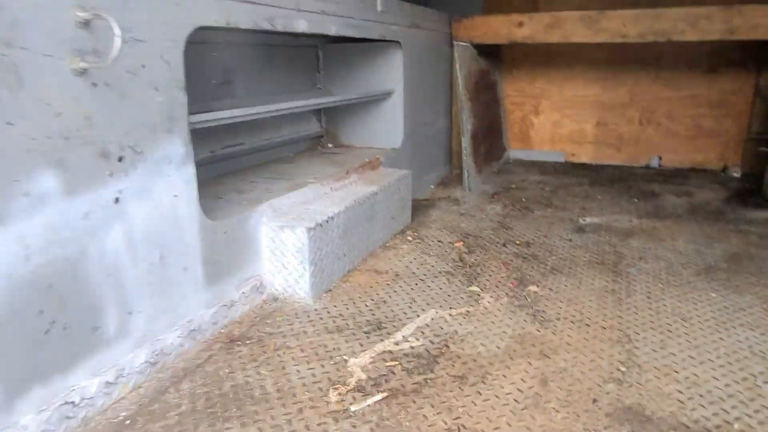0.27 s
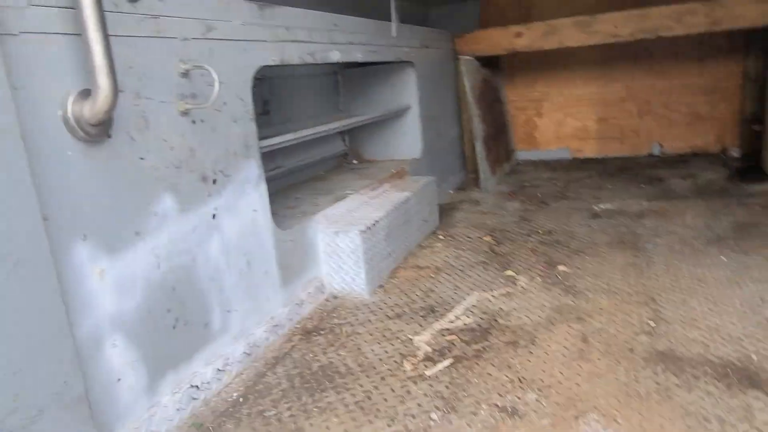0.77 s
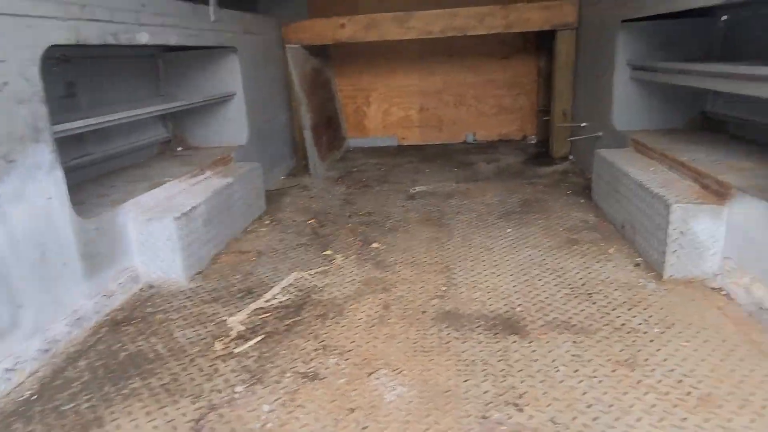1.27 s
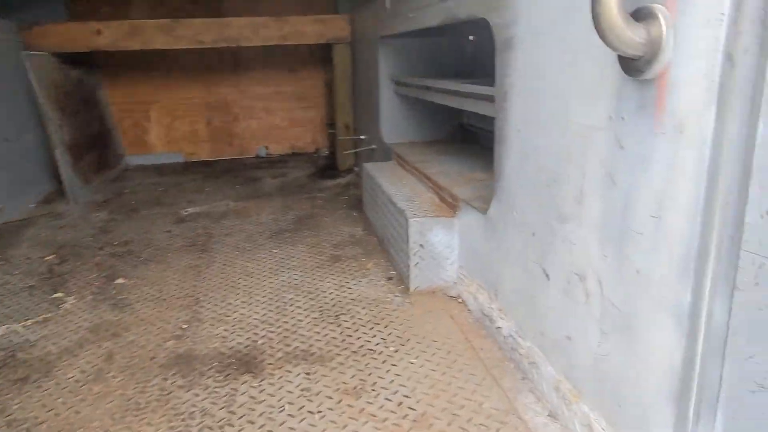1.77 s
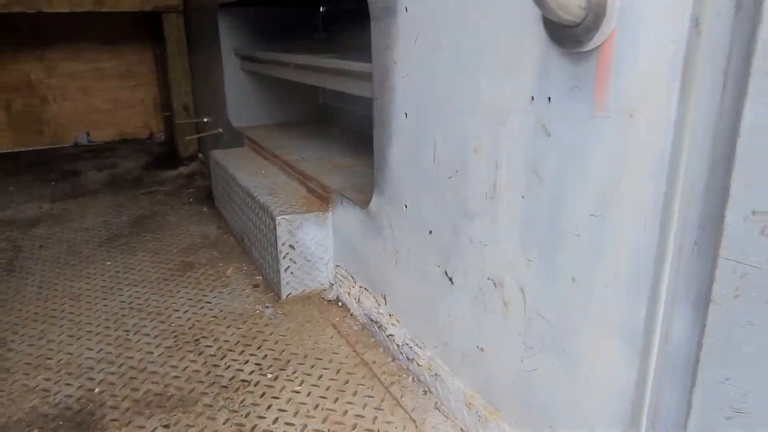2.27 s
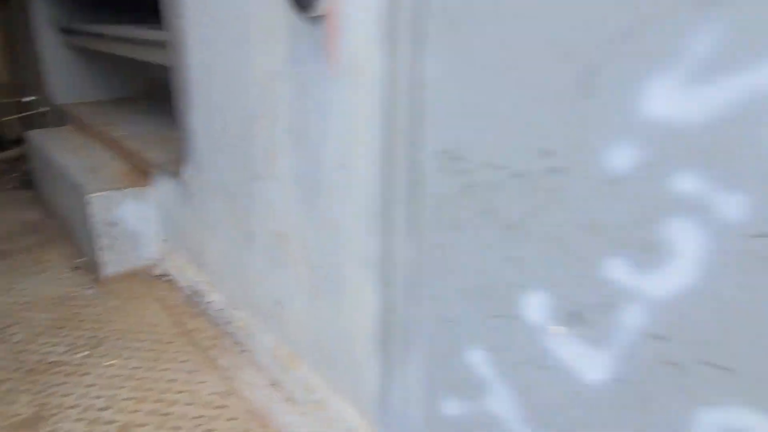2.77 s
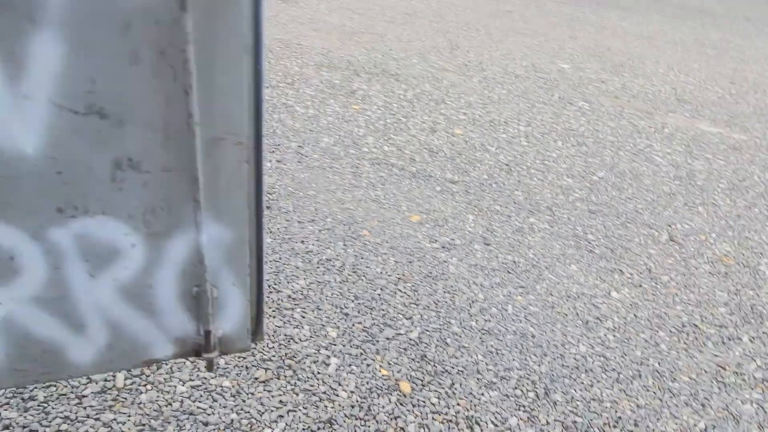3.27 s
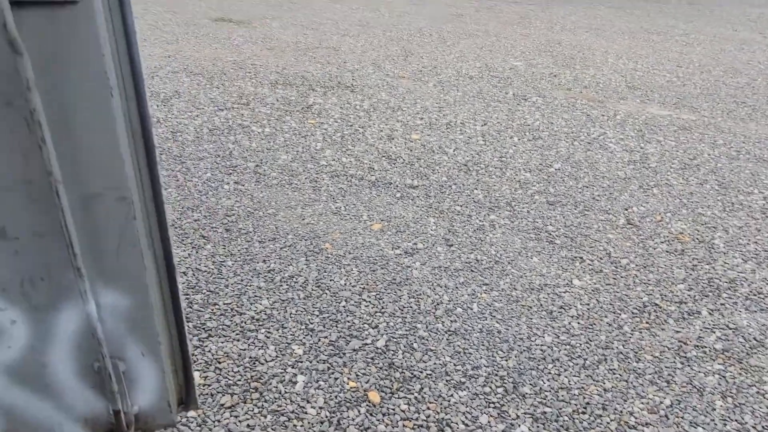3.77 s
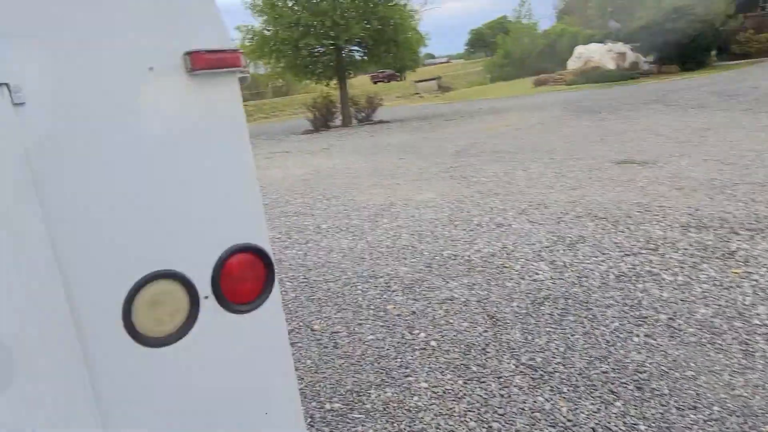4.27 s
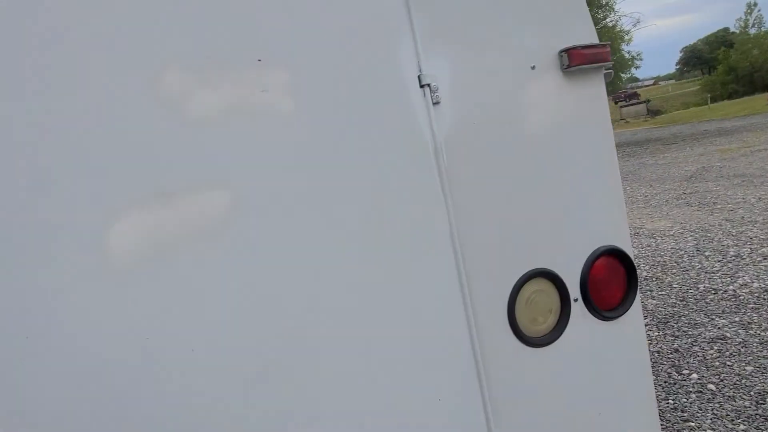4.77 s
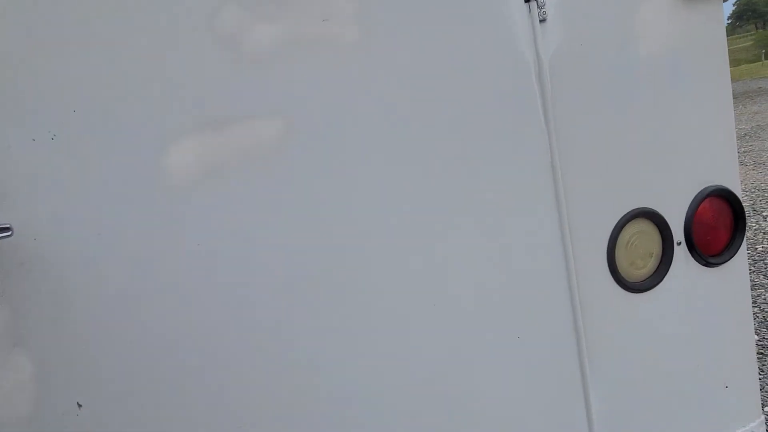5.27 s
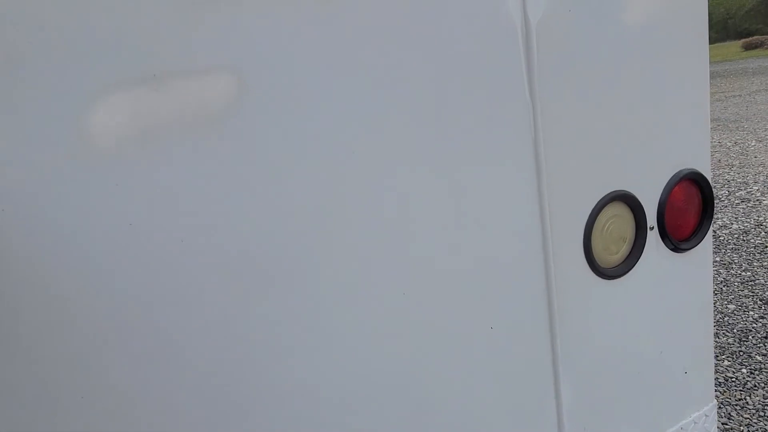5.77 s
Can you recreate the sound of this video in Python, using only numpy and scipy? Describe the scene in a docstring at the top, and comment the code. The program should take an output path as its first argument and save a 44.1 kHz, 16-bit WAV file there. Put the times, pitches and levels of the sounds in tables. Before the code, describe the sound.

Close up at the rear of an empty steel van body on a gravel yard, a latch knocks at once and lighter metal clicks follow. Stones tick, then a heavy double slam booms through the panels around two seconds. After a quieter stretch with faint gravel and traffic roar, latches clack at four seconds, and a final clattering slam thuds near the end. A handheld phone picks it up, loud peaks slightly squashed.

```python
"""A metal knock sounds at once, over booming panels, a low throbbing hum and a far traffic roar.
A phone lies near the open rear of an empty steel van body on a gravel yard. Latches, rods and door edges
knock and rattle (thumps and noise bands that die away), and jolts set the panels booming (noise through
resonances). Stones tick and soles crackle on gravel (filtered noise); a hinge squeaks (a wavering tone).
Levels in the tables come before the mix gain and the soft rounding at the end."""
import sys
import numpy as np
from scipy import signal
from scipy.fft import rfft, irfft
from scipy.io import wavfile
from scipy.ndimage import uniform_filter1d

SR = 44100
rng = np.random.default_rng(int(sys.argv[2]) if len(sys.argv) > 2 else 0)


def transcribe(signal):
    """Save signal, clipped to [-1, 1], as a 16-bit WAV file at the path in sys.argv[1]."""
    frames = np.atleast_2d(signal).T
    limited = np.clip(frames, -1, 1)
    pcm = np.round(limited * 32767).astype(np.int16)
    wavfile.write(sys.argv[1], SR, pcm)


N = 265482
TIME_S = np.arange(N) / SR
BIN_HZ = np.fft.rfftfreq(N, 1 / SR)


def undb(db):
    """Turn decibels into a plain multiplier."""
    return 10 ** (np.asarray(db) / 20)


def unit(x):
    """Scale a sound to an average (RMS) strength of 1."""
    return x / np.sqrt(np.mean(x ** 2))


def over_time(table):
    """Draw straight lines between the rows of a table: one value a sample for each column."""
    times, *columns = np.transpose(table)
    return [np.interp(TIME_S, times, column) for column in columns]


def over_hz(table, hz):
    """Read a (frequency, value) table at any frequency, with equal steps per octave."""
    table_hz, values = np.transpose(table)
    return np.interp(np.log(np.maximum(hz, 1)), np.log(table_hz), values)


def ring(x, hz, width):
    """Let a sound through one resonance, which passes its centre pitch at full strength."""
    b, a = signal.iirpeak(hz, hz / width, SR)
    return signal.lfilter(b, a, x)


def walk(rate):
    """Wander in straight lines between random values, rate of them a second, spread a little under 1."""
    hold = int(SR / rate)
    steps = np.repeat(rng.standard_normal(N // hold + 1), hold)
    return uniform_filter1d(steps, hold)[:N]


def shaped(gain):
    """Make two unrelated noises with the given gain at each frequency."""
    return irfft(rfft(rng.standard_normal((2, N))) * gain, N)


# Blows on the metal: (time [s], level [dB], ring pitch [Hz], bright [dB], top [dB],
# time to fall 60 dB at 3000 Hz [s], ring [dB], crack [dB]); all dB after the first are relative to it
KNOCKS = [(.0014, -14, 766, -14.5, -16.5, 0.28, -2, -27), (.097, -33, 780, -24, -25, 0.15, -12, 12),
          (.148, -18.5, 1200, -27, -33, 0.24, 2.5, 7.5), (0.32, -21.5, 5350, -5, -17, 0.26, -5, -21),
          (.4193, -16, 1720, -7, -8, 0.55, 4, -21), (.728, -26.5, 1200, -1, -18, 0.36, -22, -16),
          (0.747, -25.5, 4300, -11, -12.5, 0.75, -22, -24), (1.106, -28.5, 767, -2, -7, 0.53, 1.5, -20),
          (1.193, -35, 825, -13, -25, .17, -9, 18.5), (1.3707, -14, 4170, 0.5, -3, 0.33, 3.5, -15),
          (1.398, -14, 3030, -9, -33, 0.44, -13, 2), (1.442, -12, 1230, -25, -42, 0.36, -8, -3),
          (1.702, -15.5, 6900, 1, 2, 0.31, -39, -18), (1.714, -17.5, 4600, -0.5, -12, 0.63, -20, -24),
          (1.7592, -29.5, 900, -16, -20, 0.28, -19, 16.5), (2.018, -2.5, 2280, 0, -11, 0.44, -24, -14),
          (2.033, -7.5, 4170, -12, -15, 1, -1, -4), (2.152, -5, 5600, -4, -3.5, .4, -16, -14.5),
          (2.168, -3.5, 3570, -4, -15, 0.35, -29, -8), (2.205, -12, 1380, -8, -16, 0.54, -1.5, -18),
          (2.571, -16.5, 3720, -6, -13, 0.61, -24, -26), (3.1494, -42.5, 780, 1.5, 2.5, 0.74, -2, -27),
          (3.239, -27.5, 694, -3.5, -7.5, 0.5, -37, 0), (3.809, -28, 1320, -19, -25, 0.95, -16, -7),
          (3.8295, -10.5, 3100, -14.5, -16.5, 0.26, -9, -3.5), (4.0165, -9, 3160, -9, -9, 0.18, -17, -2),
          (4.026, -6.5, 3180, -5, -30, .33, -27, -0.5), (4.185, -12.5, 2550, -7, -8, .1, -7, -10.5),
          (4.2997, -11.5, 2790, -8, -11, 0.14, 1.5, -6), (5.146, -30, 750, -24, -24, 0.53, -2, 1),
          (5.267, -10.5, 2170, -8, -17, 0.2, -4, -3.5), (5.647, -16.5, 2500, -8, -24, .21, -4, 2),
          (5.6797, -31, 5350, -10, -1, 0.14, -22, -22), (5.702, -19.5, 2200, -11, -6, 0.13, -22, -13),
          (5.797, -12.5, 2480, -7.5, -15, 0.53, -6, -8), (5.8243, -5, 2520, -9.5, -10.5, 0.36, -1, -21),
          (5.873, -5.5, 1870, -6, -8.5, .14, -20, -6), (5.92, -11, 2580, -11, -2, 0.097, -12, -5)]
# Tone colour shared by all blows: (frequency [Hz], level in a band [dB])
STEEL_COLOUR = [(250, -10.5), (600, -7.5), (1300, -19.5), (2500, -17), (4000, -14.5), (6800, -9),
                (8500, -15.5), (12500, -10), (16000, -13)]
# Pitches at which latch rods and door frames ring: (frequency [Hz], level [dB])
STEEL_MODES = [(780, -3.5), (1290, -3), (1720, -12.5), (2250, -11.5), (2550, -9), (3080, -7), (4150, -8.5),
               (5350, -4.5), (6900, -9)]
KNOCK_BASS_DB = -8.5  # at 600 Hz and below
RATTLE_SHARE = 0.037  # a blow rattles for this share of its fall time before it dies
HOP = 16  # samples between steps of the loudness curves


def crack(hz):
    """The first push of a blow, longer for a lower pitch, carries a tone and noise around it."""
    t = np.arange(SR // 20) / SR
    noise = rng.standard_normal((2, len(t)))
    contact_s = .0007 + 1 / hz
    push = t / contact_s * np.exp(1 - t / contact_s)
    rough = ring(ring(noise, 1.13 * hz, 2.0 * hz), 0.83 * hz, 0.89 * hz)
    return push * (np.sin(2 * np.pi * hz * t) + 0.6 * unit(rough))


def knocks():
    """Each blow cracks, rattles, then dies, the treble first; steel modes near its pitch ring strongest."""
    bands = 280 * 2 ** np.arange(0, 5.9, 1 / 3)  # three bands an octave [Hz]
    modes, modes_db = np.transpose(STEEL_MODES)
    centres = np.append(bands, modes)
    octaves = np.append(np.full(len(bands), .2), np.full(len(modes), .07))  # width of each noise band
    t = np.arange(0, SR * 3 // 4, HOP) / SR
    power = np.zeros((len(centres), (N + SR) // HOP))
    out = np.zeros((2, N + SR))
    # loose parts bounce: the loudness jumps every 64 samples
    bounces = np.clip(rng.exponential(size=N // 64 + 1), 0, 4)
    chatter = undb(1.25 * bounces.repeat(64)[:N])
    rise = 1 - np.exp(-t / (0.00082 + 11.0 / centres[:, None]))  # the bass needs a few cycles to build
    for s, db, hz, bright_db, top_db, t60, ring_db, crack_db in KNOCKS:
        start = int(s * SR)
        # modes far from the blow's pitch are weaker, and partly up to luck
        apart = np.abs(np.log2(modes / hz))  # in octaves
        luck = rng.standard_normal(len(modes))
        near_db = np.maximum(-40 * apart, -13) + 4.2 * luck * (apart > .1)
        colour_db = np.append(over_hz(STEEL_COLOUR, bands), ring_db + modes_db + near_db)
        tone = [(600, KNOCK_BASS_DB), (1100, 0.0047), (2500, 0), (5500, bright_db), (11000, top_db)]
        colour_db = colour_db + over_hz(tone, centres)
        fade = t60 * (centres[:, None] / 3000) ** -.25
        late = np.maximum(t - RATTLE_SHARE * t60, 0)
        tail = undb(-52) * 10 ** (-6 * t / (3.66 * fade))  # the hollow body keeps a weak, longer tail
        shape = 10 ** (-6 * late / fade) + tail
        step = start // HOP
        power[:, step:step + len(t)] += undb(2 * (db + colour_db))[:, None] * rise * shape
        hit = crack(hz)
        out[:, start:start + hit.shape[1]] += undb(db + crack_db) * hit
    out = out[:, :N]
    for hz, width, band_power in zip(centres, octaves, power):
        band = unit(shaped(np.exp(-(np.log2(BIN_HZ / hz + 1e-9) / width) ** 2)))
        size = np.interp(np.arange(N) / HOP, np.arange(len(band_power)), np.sqrt(band_power))
        bouncing = unit(chatter ** min(hz / 3000, 1))  # the bass bounces less
        out = out + band * size * bouncing * undb(2.0 * walk(30))
    return out


# Pitches of the walls and doors, in three groups: (frequency [Hz], width [Hz], level [dB])
DEEP_PANELS = [(50.1, 17, -1.5), (63.4, 6.5, 3), (82.9, 11, 4)]
MIDDLE_PANELS = [(110.8, 12.8, 2), (139.6, 23, -0.5), (163.1, 14.7, -0.5), (196, 15, -4.5)]
UPPER_PANELS = [(240.4, 69, 3), (289.5, 19, 1.5), (335, 53, 0), (388.1, 38, 0), (470, 120, -6),
                (546, 76, -8)]
# Jolts that set the body booming: (time [s], level [dB], deep panels [dB], upper panels [dB],
# time to fall 60 dB, before each group's share [s]); the panel dB are relative to the level
BOOMS = [(0., -40, 11, 12, 0.92), (.15, -17.5, -9, -8, 0.76), (.22, -27.5, 3, -7, 0.93),
         (.43, -36.5, 2, 9, 1.63), (.72, -30, -4.5, -4, 1.6), (1.38, -28, -1, -1, 2),
         (1.711, -43.5, 7, -2, 0.53), (2.021, -14.5, 6, 3.5, 1.8), (2.17, -5.5, -10, -9, 2.9),
         (2.57, -18, -7, -8.5, 1.7), (3.83, -32, -8, 4.5, 2.1), (4.02, -31.5, -18, 6, 1.34),
         (4.302, -27.5, -13, 8, 0.58), (5.17, -25, 3, -5.5, 1.6), (5.27, -19.5, -0.5, -4, 1.15),
         (5.8, -8, 6.5, -11.5, 0.83), (5.86, -0.5, -19, -7, 1.18)]
# deep, middle and upper panels in turn
BOOM_RISE_S = (0.02, 0.025, 0.026)
BOOM_T60_SHARE = (1.24, 0.98, .8)
REST_DB = (-41.5, -37.5, -43.5)  # the panels never fall quite still


def panel_noise(modes):
    """Noise through narrow resonances wavers as a panel does; modes close in pitch beat together."""
    total = 0
    for hz, width, db in modes:
        noise = rng.standard_normal((2, N))
        total = total + undb(db) * unit(ring(ring(noise, hz, width), hz, width))
    return unit(total)


def even(x):
    """Level out the wavering, so that panels hold a fairly even level between blows."""
    return x / np.sqrt(uniform_filter1d(x ** 2, int(.08 * SR)) + 0.016)


def panels():
    """Each jolt swells and dies in the lowest modes of walls and doors."""
    power = undb(2 * np.array(REST_DB))[:, None] * np.ones(N)
    rise, share = np.array(BOOM_RISE_S)[:, None], np.array(BOOM_T60_SHARE)[:, None]
    for s, db, deep_db, upper_db, t60 in BOOMS:
        start = int(s * SR)
        since = TIME_S[start:] - s
        shape = (1 - np.exp(-since / rise)) ** 2 * 10 ** (-6 * since / (t60 * share))
        group_db = db + np.array([deep_db, 0, upper_db])
        power[:, start:] += undb(2 * group_db)[:, None] * shape
    deep, middle = even(panel_noise(DEEP_PANELS)), even(panel_noise(MIDDLE_PANELS))
    upper = panel_noise(UPPER_PANELS)
    return sum(np.sqrt(p) * x for p, x in zip(power, (deep, middle, upper)))


# Loudness of each hum tone: (time [s], level [dB])
HUM_LEVEL = [(0., -38), (.18, -40), (.26, -25), (.5, -34), (.72, -27.5), (.9, -37), (1.3, -34), (2., -41.5),
             (3.5, -42), (6.02, -47)]
HUM_HZ = (55, 68.5)  # two tones that beat about 13.5 times a second


def hum():
    """Two low tones throb against each other, perhaps an engine idling some way off."""
    drift = np.cumsum(1 + .01 * walk(2.98)) / SR  # the pitch wanders by about one percent
    tones = sum(np.sin(2 * np.pi * (hz * drift + rng.random())) for hz in HUM_HZ)
    return undb(over_time(HUM_LEVEL)[0]) * tones


# Loudness of the roar between 600 and 2200 Hz: (time [s], level [dB])
TRAFFIC_LEVEL = [(0., -29.5), (.8, -36.5), (2.2, -33.5), (2.9, -40), (3.8, -37), (4.2, -32.5), (6.02, -36)]
# Tone colour of the roar: (frequency [Hz], level per Hz [dB])
TRAFFIC_COLOUR = [(15, -32.5), (28, -22), (64, -5.5), (130, -17.5), (326, -24), (550, -22.5), (800, -18),
                  (1050, -19), (1550, -22), (2300, -34), (4160, -48.5), (6000, -62), (7800, -79),
                  (13200, -120)]


def traffic():
    """Distant tyre roar is smooth coloured noise that swells slowly."""
    gain = undb(over_hz(TRAFFIC_COLOUR, BIN_HZ)) * (BIN_HZ > 15)
    mids = (BIN_HZ > 600) & (BIN_HZ < 2200)
    # scale so that the mids alone have strength 1
    roar = unit(shaped(gain)) * np.sqrt(np.sum(gain ** 2) / np.sum(gain[mids] ** 2))
    return roar * undb(over_time(TRAFFIC_LEVEL)[0] + 1.0 * walk(2.1))


# Soles dragging over gravel: (time [s], level [dB])
SHUFFLE = [(0., -51.5), (.47, -44.5), (.6, -50.5), (1.9, -48.5), (2.5, -42), (2.9, -56.5), (3.84, -57.5),
           (4.1, -46), (4.56, -61.5), (5.2, -46.5), (5.45, -63), (5.68, -55.5), (5.9, -33.5)]
# Single stones ticking: (time [s], level [dB], pitch [Hz])
STONES = [(.28, -40, 5000), (1.511, -36, 8900), (1.728, -16, 5940), (1.769, -26, 8000), (1.812, -19, 4170),
          (1.826, -24, 5070), (1.859, -34, 12000), (1.878, -32, 12500), (2.753, -36, 10500),
          (2.833, -39, 12100), (2.895, -38, 8100), (2.99, -38.5, 6800), (3.308, -37, 8800),
          (3.335, -44.5, 8000), (3.426, -39, 5530), (3.784, -41, 3200), (4.444, -41, 8200),
          (4.461, -45, 9000), (4.494, -49, 10000), (4.511, -40, 6000), (4.646, -50, 9700),
          (5.079, -33, 5300)]
# faint ticks at random moments, up to 3 dB above or below PEBBLE_DB
PEBBLES_PER_S, PEBBLE_DB, PEBBLE_HZ = 3, -54, (6000, 12000)
GRIT_DB = -8.5  # the crackle's brighter part, against its main part


def gravel():
    """Single stones tick as short bursts of noise; dragged soles crackle as dense tiny grains."""
    out = np.zeros((2, N + SR))
    t = np.arange(SR // 20) / SR
    pebbles = [(when * N / SR, PEBBLE_DB + 6.0 * (loud - .5), np.interp(pitch, (0, 1), PEBBLE_HZ))
               for when, loud, pitch in rng.random((PEBBLES_PER_S * N // SR, 3))]
    fade = np.exp(-t / 0.0015) + 0.45 * np.exp(-t / 0.0061)
    for s, db, hz in STONES + pebbles:
        start = int(s * SR)
        noise = rng.standard_normal((2, len(t)))
        out[:, start:start + len(t)] += undb(db) * unit(ring(noise, hz, hz / 3.1)) * fade
    # a few grains stand far above the rest
    grain_db = 1.34 * rng.exponential(size=N) + 3.1 * walk(48)
    grains = rng.standard_normal((2, N)) * undb(grain_db)
    main = unit(ring(ring(grains, 6800, 4500), 3000, 3300))
    grit = unit(ring(ring(grains, 8500, 3800), 12300, 4500))
    return out[:, :N] + undb(over_time(SHUFFLE)[0]) * (main + undb(GRIT_DB) * grit)


# The hinge's gliding pitch: (time [s], pitch [Hz], level [dB])
SQUEAK = [(1.56, 10510, -47), (1.596, 12200, -60), (1.698, 11300, -67.5)]


def hinge():
    """A hinge squeaks as one thin tone whose pitch glides and wavers."""
    hz, db = over_time(SQUEAK)
    edge_s = np.minimum(TIME_S - SQUEAK[0][0], SQUEAK[-1][0] - TIME_S)
    on = np.clip(edge_s / 0.009, 0, 1)  # soft start and end
    phase = 2 * np.pi * np.cumsum(hz * (1 + 0.0035 * walk(300))) / SR
    return np.sqrt(2) * on * undb(db) * np.array([np.sin(phase), np.cos(phase)])


# How alike the two ports sound: (frequency [Hz], common share [0-1])
LIKENESS = [(60, 0.92), (200, 1), (500, 0.86), (1200, 0.44), (3000, 0), (16000, 0.4)]
# Balance of the two ports: (frequency [Hz], left minus right [dB])
LEFT_DB = [(60, 1.5), (110, 0), (200, 1), (380, 4), (700, 2.5), (1290, -1.5), (2380, -1), (4400, -3.5),
           (8120, -0.5), (15000, 4)]
PORT_LAG_S = 0.00046  # the common part reaches the right port this much later


def scene():
    """Two microphone ports: the right one hears the common part later, plus a part of its own."""
    common, own = rfft(knocks() + panels() + hum() + traffic() + gravel() + hinge())
    share = np.clip(over_hz(LIKENESS, BIN_HZ), 0, 1)
    tilt = undb(over_hz(LEFT_DB, BIN_HZ) / 2)  # half the balance goes to each side
    delayed = common * np.exp(-2j * np.pi * BIN_HZ * PORT_LAG_S)
    right = share * delayed + np.sqrt(1 - share ** 2) * own
    return undb(-1.5) * irfft(np.array([common * tilt, right / tilt]), N)


TOP_HZ = 16000


def record(dry):
    """The phone rounds the loudest peaks and cuts the treble above TOP_HZ."""
    rounded = np.tanh(0.69 * dry) / 0.96
    low_pass = signal.ellip(8, .2, 55, TOP_HZ, fs=SR, output="sos")
    return signal.sosfilt(low_pass, rounded)


dry = scene()
out = record(dry)
transcribe(out)
```